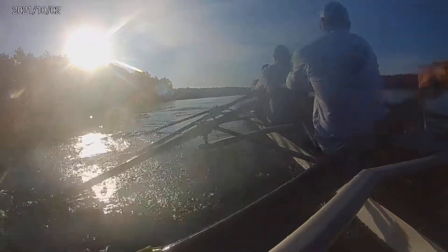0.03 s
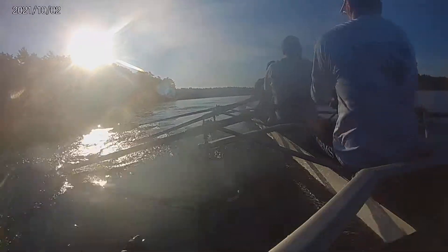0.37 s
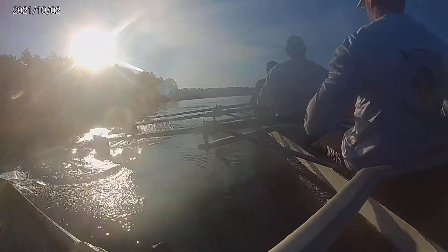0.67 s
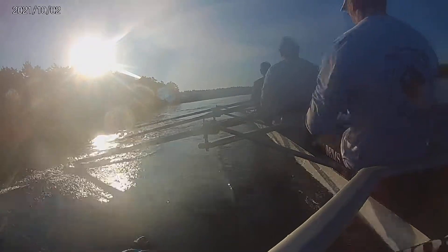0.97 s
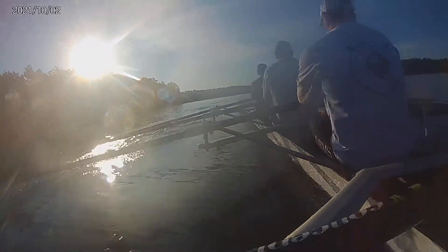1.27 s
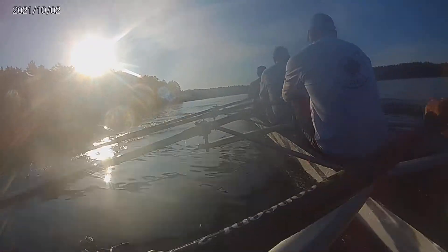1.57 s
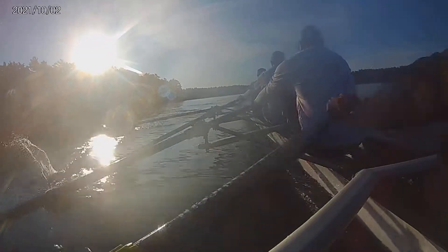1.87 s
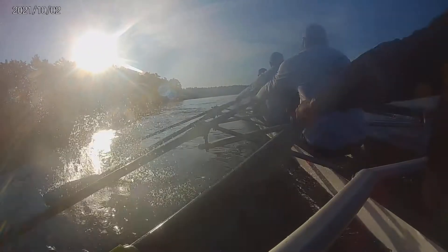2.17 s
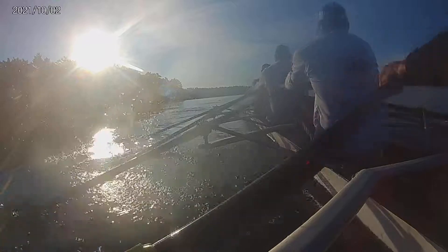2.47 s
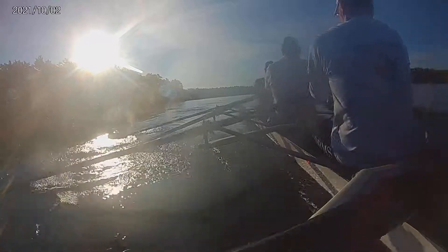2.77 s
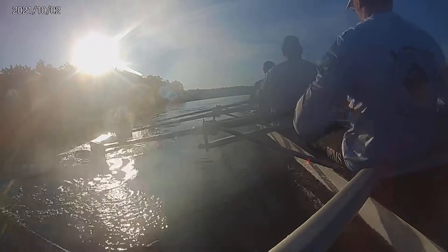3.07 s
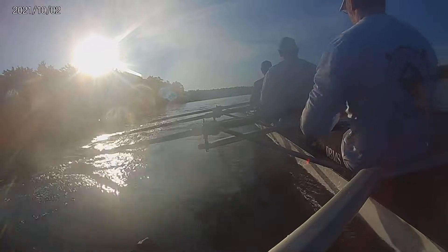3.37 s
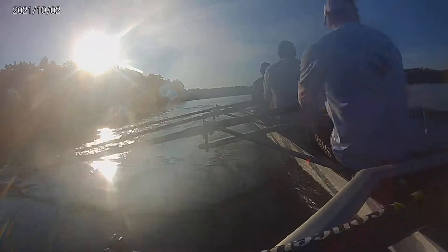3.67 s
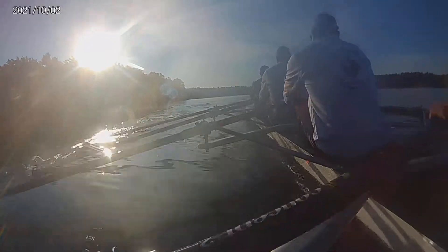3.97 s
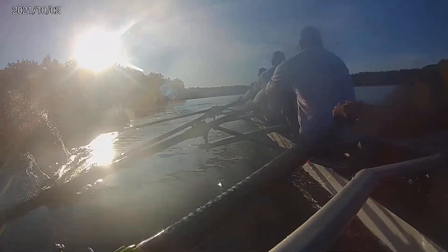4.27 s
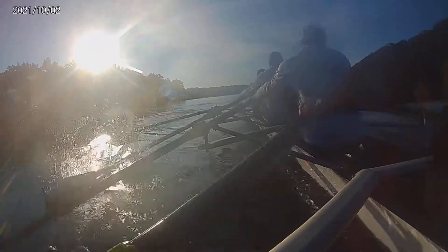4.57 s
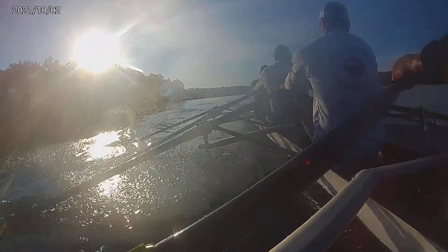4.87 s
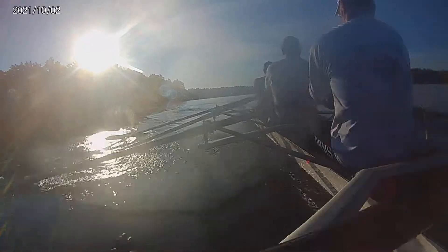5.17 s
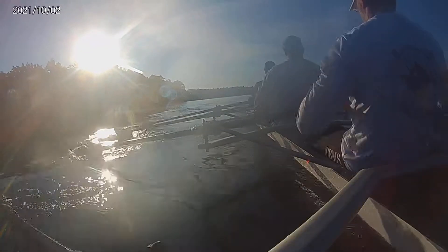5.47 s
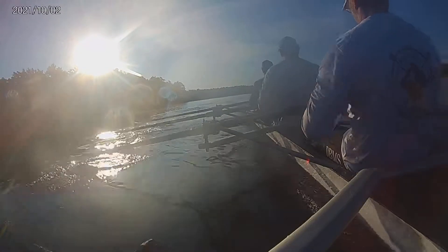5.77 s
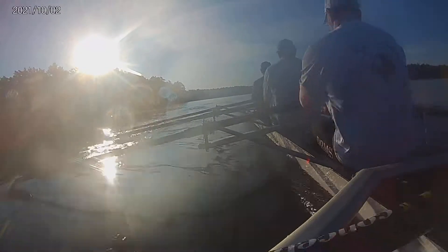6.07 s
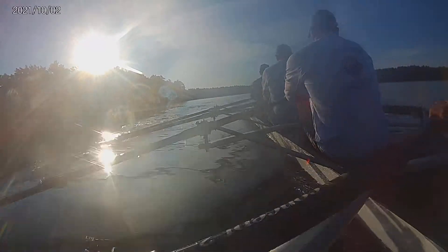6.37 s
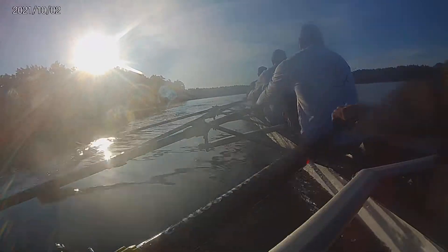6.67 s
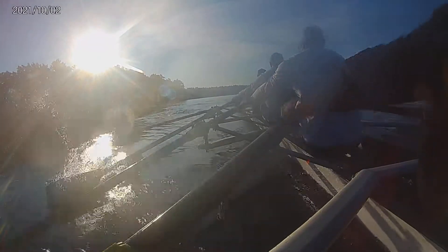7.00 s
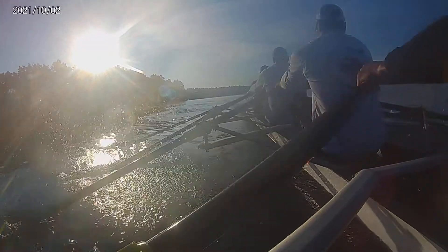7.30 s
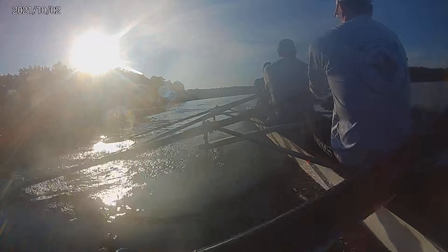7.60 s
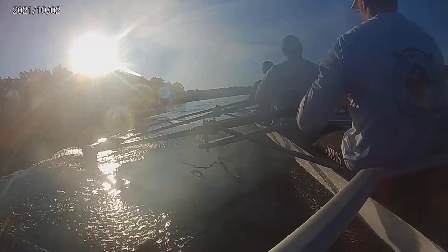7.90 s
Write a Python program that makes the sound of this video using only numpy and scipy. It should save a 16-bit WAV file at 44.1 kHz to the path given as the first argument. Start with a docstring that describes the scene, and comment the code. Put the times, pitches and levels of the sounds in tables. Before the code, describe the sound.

Hard, hollow knocks of oars in their locks come in a steady rowing rhythm, over sliding seats that rumble along their tracks. Water churns dully on each pull, the hull drums, and the oars scrape briefly before leaving the water. Between strokes the sound eases to light rattles and a few sharp ticks. The microphone sits in a case fixed to the boat, so it all sounds close and boxy, with slight overload.

```python
"""Oars knock in their locks as a crew rows a racing shell on calm water; riggers and hull ring.
Seats rumble along their tracks, the hollow hull booms, blades churn the water, the frame sways.
Oar sleeves scrape, wet plastic squeaks, sharp ticks sound. All is heard through a closed camera case
clamped to the boat; vibration overloads the microphone at catch and finish, so loud moments crackle."""
import sys
import numpy as np
from scipy import signal
from scipy.io import wavfile
from scipy.ndimage import uniform_filter1d

SR = 44100
rng = np.random.default_rng(int(sys.argv[2]) if len(sys.argv) > 2 else 0)


def bounce(signal):
    """Save signal as a 16-bit WAV file at the path given by the first command-line argument."""
    frames = np.transpose(np.atleast_2d(signal))
    limited = np.clip(frames, -1, 1)
    pcm = np.round(limited * 32767).astype(np.int16)
    wavfile.write(sys.argv[1], SR, pcm)


N = 350154
TIME_S = np.arange(N) / SR
CONTROL_HOP = 40  # samples per step of slow curves

# Oar and seat knocks. Each row: start in seconds, then hull thump, rigger clunk, lock clack in relative dB.
KNOCKS = [(0.01, -6, -14, -34), (0.125, -6.5, -35, -40), (0.362, 2, -5, -22), (0.371, 8.5, -15, -10.5),
          (0.411, -4, -15, -18.5), (0.432, -18, -12, -28), (0.472, -4.5, -0.5, -9.5),
          (0.508, -3.5, 0, -5.5), (0.603, 10, -9.5, -14), (0.641, 8, -5.5, -22), (0.849, -22, -16, -18),
          (0.973, 12, -4, -5), (1.437, -26, -28, -18), (1.604, -22.5, -37, -27), (1.853, -9.5, -10, -28),
          (1.897, 5, -2, -1), (1.918, 10, -1, -20), (2.108, 6, 1, -8), (2.191, -5, -11.5, -12.5),
          (2.351, -15, -26, -16), (2.737, 2.5, -13, -19), (3.089, 2, -6, -11.5), (3.172, 0.5, -6.5, -12.5),
          (3.216, 4.5, -25, -30), (3.47, -31, -28, -25.5), (3.803, -3.5, -15.5, -28),
          (3.878, -3.5, -28, -13.5), (3.934, -6, -28, -15.5), (4.191, -2, -15, -17.5),
          (4.323, 9, -3.5, 0.5), (4.334, 9.5, -0.5, -20), (4.56, 5, 1, -16), (4.612, 6.5, -18, -10),
          (4.762, -34, -24, -15), (5.128, 7, -13.5, -15), (5.297, -13.5, -15.5, -20.5),
          (5.433, 4, -20, -20.5), (5.496, 6.5, -8.5, -26), (5.586, 2.5, -13.5, -40), (6.258, -11, -28, -19),
          (6.476, -11, -27, -22), (6.645, -13, -15.5, -20), (6.749, 3.5, 0, -13), (6.783, 12, -6.5, -17),
          (6.957, -4, -11.5, -24), (7.046, 5.5, -17, -9), (7.133, -12, -24, -12.5), (7.172, 3, -20, -15),
          (7.212, 2, -26, -17), (7.704, 9.5, -4, -10), (7.835, -11, -12, -19.5)]
# Modes rung by a knock. Each row: frequency in Hz, relative level in dB, 60 dB decay time in seconds.
HULL_MODES = [(117, -8, 0.068), (163.4, -2.5, .17), (211.7, -6, 0.15), (297.3, -8.5, 0.063)]
RIGGER_MODES = [(364, -10.5, 0.017), (471.7, -0.5, 0.06), (666.7, 5, 0.094), (682.4, -2.5, 0.096),
                (897, -20, 0.1)]
LOCK_MODES = [(1107, -2, 0.087), (1321, 8, 0.053), (1496, 1, 0.034), (1594, -2, 0.075), (1749, -9.5, 0.015)]
# Blades enter at the catch, leave at the finish. Each row: catch time, finish time and finish length
# in seconds, then seat, catch and finish gain in dB.
STROKES = [(-0.53, 0.508, .22, -2, -1, 0.5), (1.893, 2.988, 0.2, 0, -3, 0.5),
           (4.323, 5.426, .14, -0.5, 0.5, 0.5), (6.744, 7.875, .14, 1.5, -2, -1)]
# Seat rumble over a stroke, loudest when fastest. Each row: seconds after the catch, relative level in dB.
SEAT_RUN = [(0.0, -21), (0.12, -15.5), (0.38, -21.5), (0.75, -27), (0.88, -25), (1.2, -28.5), (1.45, -36.5),
            (1.68, -33), (2.0, -24), (2.25, -20.5), (2.37, -23.5)]
# Seat stops and surges. Each row: centre in seconds, half length in seconds, level change in dB.
SEAT_CHANGES = [(0.35, 0.03, 5), (1.038, 0.032, -8), (1.998, 0.056, 3), (3.13, 0.046, 8), (3.27, .03, -6),
                (3.42, 0.048, -7), (3.51, 0.054, 2.5), (4.162, .03, 3), (5.386, 0.054, -12.5),
                (5.66, .05, -7), (5.913, 0.1, -7), (6.842, 0.029, -9.5), (7.772, 0.052, -11),
                (7.904, 0.029, 11.5)]
# Resonances of boat parts and camera case. Each row: centre in Hz, width in Hz, gain in dB.
TRACK_BANDS = [(1075.7, 47, -7), (1299.3, 62, -1.5), (1422.7, 104, 1.5), (1511, 209, -3.5),
               (1792, 130, -18.5), (2353, 45, -19)]
BEARING_BANDS = [(3170, 120, -4.5), (4330, 970, -7), (5600, 1400, -12.5)]
HULL_BANDS = [(176.7, 40.3, -2), (209, 128, -21), (332, 48, -23.5)]
RIGGER_BANDS = [(363, 25, -11), (465.9, 31, -0.5), (645.6, 32, 0), (691.3, 81, -0.5), (828, 130, -8),
                (1115, 390, -13.5)]
FRAME_BANDS = [(28.7, 29.3, -4), (50.9, 15, -7), (70, 10.7, 8), (100.4, 36.4, -7.5), (124.6, 26, -10),
               (215.7, 22, -11.5), (269.6, 47, -15.5)]
SLEEVE_BANDS = [(1241, 170, 5.5), (1869, 125, 5), (2140, 400, -35), (3200, 1200, -25), (4140, 640, -18.5),
                (5400, 1100, -32.5)]
CASE_BANDS = [(1570, 320, 10), (3830, 730, -0.5), (5140, 830, -2), (6360, 730, -6.5)]
# Lurches as the crew swings forward. Each row: peak time in seconds, relative level in dB.
LURCHES = [(0.79, -11.5), (1.119, -18), (3.73, -24.5), (3.89, -20.5), (6.259, -11.5)]
# Sleeves grinding in the locks. Each row: peak time in seconds, 20 dB rise in seconds, relative level in dB.
SCRAPES = [(0.29, .17, -23.5), (2.78, 0.14, -27), (2.925, 0.1, -25), (5.17, 0.03, -22), (7.61, 0.2, -27.5)]
# Sharp ticks: drops on the case and brief overload crackles.
# Each row: start in seconds, relative level in dB.
TICKS = [(0.023, -37), (0.9223, -26), (1.1087, -25), (1.6871, -37), (3.3563, -28.5), (3.4196, -40),
         (3.706, -34), (3.803, -37), (4.2363, -35), (4.6703, -43), (5.7608, -43), (6.2612, -23.5),
         (6.4218, -35)]
# Gear squeaks. Each row: start and length in seconds, start and end pitch in Hz, level in dB.
SQUEAKS = [(7.27, .11, 4500, 4400, -42), (7.43, .08, 5620, 5700, -50)]


def knocks(thump_db, clunk_db, clack_db, travel_s):
    """A blow in the lock travels down the rigger into the hull."""
    out = np.zeros(N)
    for start_s, hull_db, rigger_db, lock_db in [*KNOCKS, *rattles(per_s=3, spread_db=2.5)]:
        thump = strike(HULL_MODES, uneven_db=4.5, rattle=0.25, rattle_s=0.013)
        clunk = strike(RIGGER_MODES, uneven_db=2.5, rattle=0.91, rattle_s=0.0097)
        clack = strike(LOCK_MODES, uneven_db=5, rattle=2.5, rattle_s=0.0094)
        add(out, start_s + travel_s, from_db(hull_db + thump_db) * thump)
        add(out, start_s, from_db(rigger_db + clunk_db) * clunk)
        add(out, start_s, from_db(lock_db + clack_db) * clack)
    return out


def strike(modes, uneven_db, rattle, rattle_s):
    """One contact and a brief rattle ring a part; rms 1 over the first 20 ms."""
    t = TIME_S[:SR // 3]
    hz, db, t60_s = np.transpose(modes)[:, :, None]
    size, detune = rng.standard_normal((2, len(modes), 1))
    decay = from_db(db + uneven_db * size - 60 * t / t60_s)
    ring = np.sum(decay * np.sin(2 * np.pi * hz * (1 + 0.024 * detune) * t), axis=0)
    force = rng.standard_normal(len(t)) * np.exp(-t / rattle_s)
    force *= rattle / np.linalg.norm(force)
    force[0] += 1
    sound = signal.fftconvolve(force, ring)[:len(t)]
    return sound / np.sqrt(np.mean(sound[:SR // 50] ** 2))


def rattles(per_s, spread_db):
    """Loose gear knocks at random, harder as the seats run faster; rows as in KNOCKS."""
    chance = rng.random((int(per_s * N / SR), 4))
    start_s = chance[:, 0] * N / SR
    db = np.interp(start_s, TIME_S, seat_level_db())[:, None] + spread_db * (2 * chance[:, 1:] - 1)
    return np.column_stack([start_s, db + [8, -4, -6]])  # thump, clunk, clack


def seats(bumps_per_s, bump_db, judder_db, bearing_db, mount_hz):
    """Wheels press unevenly over grit and pits in the tracks; their bearings ring thinly."""
    contact = grains(bumps_per_s, bump_db) * from_db(judder_db * drift(19))
    tracks = low_pass(resonate(contact, TRACK_BANDS), mount_hz, order=8)
    bearings = from_db(bearing_db) * rms_one(resonate(contact, BEARING_BANDS))
    return from_db(seat_level_db()) * (steady(tracks, span_s=0.049) + bearings)


def seat_level_db(stroke_s=2.425):
    """The seats repeat one run each stroke, harder or softer, with brief stops and surges."""
    t = TIME_S[::CONTROL_HOP]
    catch_s, _, _, seat_db, _, _ = np.transpose(STROKES)
    run_db = np.interp(t - catch_s[0], *np.transpose(SEAT_RUN), period=stroke_s)
    change_db = sum(db * np.exp(-((t - s) / half_s) ** 2) for s, half_s, db in SEAT_CHANGES)
    return np.interp(TIME_S, t, run_db + np.interp(t, catch_s, seat_db) + change_db)


def hull(flutter_db):
    """The hollow shell drums under seats and water, in slow throbs."""
    drumming = steady(resonate(rng.standard_normal(N), HULL_BANDS), span_s=0.066)
    swing = from_db(-20.5) * catches(lag_s=-0.43, attack_s=0.22, hold_s=0.15, release_s=0.16)
    drive = from_db(-12.5) * catches(lag_s=0.018, attack_s=0.17, hold_s=0.36, release_s=0.058)
    way_out = from_db(-7.5) * finishes(lag_s=0.02, attack_s=0.13, release_s=0.069)
    load = follow_seats(level_db=-19, share=0.84) + swing + drive + way_out
    return load * drumming * from_db(flutter_db * drift(12))


def blade_wash(gulps_per_s, gulp_db):
    """Collapsing water pockets shake blades and riggers as the blades enter, in two bites, and as they leave."""
    entry = from_db(-16.5) * catches(lag_s=0.004, attack_s=0.042, hold_s=0.04, release_s=0.056)
    second_bite = from_db(-15.5) * catches(lag_s=0.2, attack_s=0.083, hold_s=0.06, release_s=0.13)
    way_out = from_db(-15) * finishes(lag_s=0.003, attack_s=0.075, release_s=0.075)
    churn = follow_seats(level_db=-24.5, share=0.61) + entry + second_bite + way_out
    return churn * steady(resonate(grains(gulps_per_s, gulp_db), RIGGER_BANDS), span_s=0.066)


def frame_sway():
    """The frame's lowest modes swell as the boat lurches and the blades enter and leave."""
    lurches = sum(from_db(db) * swell(s, attack_s=0.024, hold_s=0.022, release_s=0.22) for s, db in LURCHES)
    entry = from_db(-15.5) * catches(lag_s=0.033, attack_s=0.34, hold_s=0.27, release_s=0.16)
    way_out = from_db(-8) * finishes(lag_s=0.077, attack_s=0.19, release_s=0.24)
    sway = from_db(-36.5) + lurches + entry + way_out
    return sway * steady(resonate(rng.standard_normal(N), FRAME_BANDS), span_s=0.056)


def sleeve_scrapes(slips_per_s, slip_db):
    """The oar sleeve sticks and slips against the lock in a quick, uneven chatter."""
    slip_phase = np.cumsum(slips_per_s * (1 + 0.15 * drift(15))) / SR % 1
    friction = rng.standard_normal(N) * from_db(-slip_db * slip_phase)
    pressure = sum(from_db(db) * swell(s, rise_s, hold_s=0.03, release_s=0.1) for s, rise_s, db in SCRAPES)
    return pressure * rms_one(resonate(friction, SLEEVE_BANDS))


def ticks(gain_db, decay_s):
    """Sharp ticks: drops on the case and brief overload crackles."""
    bursts, t = np.zeros(N), TIME_S[:SR // 20]
    for start_s, db in TICKS:
        add(bursts, start_s, from_db(db + gain_db) * rng.standard_normal(len(t)) * np.exp(-t / decay_s))
    return resonate(bursts, CASE_BANDS)


def patter_and_crackle():
    """Water patters as the blades lift; a fine, high crackle runs through the swing back."""
    texture = 0.77 * rng.standard_normal(N) + grains(per_s=22, spread_db=2.5)
    lift = from_db(-45.5) * finishes(lag_s=0.05, attack_s=0.2, release_s=0.2)
    swing = from_db(-51.5) * catches(lag_s=-0.34, attack_s=0.25, hold_s=0.87, release_s=0.2)
    return (from_db(-53.5) + lift + swing) * rms_one(resonate(texture, CASE_BANDS))


def squeaks():
    """Wet plastic gives short gliding whistles."""
    out = np.zeros(N)
    for start_s, length_s, start_hz, end_hz, db in SQUEAKS:
        n = int(length_s * SR)
        pitch_hz = np.linspace(start_hz, end_hz, n) + 25 * drift(80)[:n]
        add(out, start_s, from_db(db) * np.hanning(n) * np.sin(2 * np.pi * np.cumsum(pitch_hz) / SR))
    return out


def swell(peak_s, attack_s, hold_s, release_s):
    """Gain of 1 from peak_s through the hold; attack and release are times per 20 dB."""
    t = TIME_S[::CONTROL_HOP]
    before = np.maximum(peak_s - t, 0) / attack_s
    after = np.maximum(t - peak_s - hold_s, 0) / release_s
    return np.interp(TIME_S, t, from_db(-20 * np.minimum(before + after, 10)))


def catches(lag_s, attack_s, hold_s, release_s):
    """One swell per blade entry."""
    return sum(from_db(db) * swell(catch_s + lag_s, attack_s, hold_s, release_s)
               for catch_s, _, _, _, db, _ in STROKES)


def finishes(lag_s, attack_s, release_s):
    """One swell per blade exit, held while the blades are drawn out."""
    return sum(from_db(db) * swell(finish_s + lag_s, attack_s, length_s, release_s)
               for _, finish_s, length_s, _, _, db in STROKES)


def follow_seats(level_db, share):
    """Gain that follows a share of the seats' swing in dB."""
    seat_db = seat_level_db()
    return from_db(level_db + share * (seat_db - seat_db.mean()))


def grains(per_s, spread_db):
    """Tiny random impacts of uneven size; rms 1."""
    sizes = from_db(spread_db * np.minimum(rng.exponential(1, N), 4)) * rng.choice([-1, 1], N)
    return rms_one(sizes * (rng.random(N) < per_s / SR))


def drift(rate_hz):
    """Smooth random wander at about rate_hz; rms 1."""
    pole = np.exp(-2 * np.pi * rate_hz * CONTROL_HOP / SR)
    settle_steps = 2000
    noise = rng.standard_normal(N // CONTROL_HOP + 2 + settle_steps)
    slow = signal.lfilter([1], [1, -2 * pole, pole * pole], noise)[settle_steps:]
    return np.interp(np.arange(N) / CONTROL_HOP, np.arange(len(slow)), rms_one(slow))


def resonate(x, bands):
    """Parallel resonances, each two band-passes in series."""
    out = 0
    for hz, width_hz, db in bands:
        r = np.exp(-np.pi * width_hz / SR)
        gain = (1 - r * r) / 2
        section = [gain, 0, -gain, 1, -2 * r * np.cos(2 * np.pi * hz / SR), r * r]
        out = out + from_db(db) * signal.sosfilt([section, section], x + 1e-18)
    return out


def steady(x, span_s):
    """Hold rms at 1 over span_s; faster flutter stays."""
    power = np.abs(uniform_filter1d(x * x, int(span_s * SR)))
    return x / np.sqrt(power + 1e-12)


def low_pass(x, hz, order):
    return signal.sosfilt(signal.butter(order, hz, fs=SR, output="sos"), x)


def bass_cut(x, from_hz, to_hz):
    """Shelf falling 6 dB an octave between two corners."""
    return signal.lfilter(*signal.bilinear([1, 2 * np.pi * to_hz], [1, 2 * np.pi * from_hz], SR), x)


def add(out, start_s, sound):
    at = max(0, round(start_s * SR))
    out[at:at + len(sound)] += sound[:max(0, N - at)]


def from_db(db):
    return 10 ** (np.asarray(db) / 20)


def rms_one(x):
    return x / np.sqrt(np.mean(x ** 2) + 1e-20)


def scene():
    """Mono mix of what reaches the camera through the boat's frame."""
    mount_hz = 2090  # the camera mount passes little above this
    rolling = seats(bumps_per_s=2200, bump_db=3.5, judder_db=2.5, bearing_db=-31, mount_hz=mount_hz)
    boom = from_db(0.5) * hull(flutter_db=1.95)
    water = from_db(-2) * blade_wash(gulps_per_s=2500, gulp_db=2)
    sway = from_db(2.5) * frame_sway()
    blows = knocks(thump_db=-4.5, clunk_db=0.5, clack_db=-0.44, travel_s=0.00202)
    through_mount = low_pass(blows + water + sway, mount_hz, order=8)
    leak = from_db(-35) * blows
    sleeves = from_db(3.5) * sleeve_scrapes(slips_per_s=110, slip_db=16.5)
    treble = squeaks() + ticks(gain_db=8.5, decay_s=0.006) + patter_and_crackle()
    return (through_mount + leak + from_db(2.5) * rolling + boom + sleeves + treble)[None]


def record(dry):
    """The input clips flat; a bass cut turns the square edges into spikes, dulled by a treble roll-off."""
    clip_level, cutoff_hz = 0.68, 15800
    clipped = clip_level * dry / (1 + np.abs(dry / clip_level) ** 24) ** (1 / 24)
    thin = bass_cut(clipped, from_hz=596, to_hz=56)
    dull = low_pass(low_pass(thin, hz=3210, order=2), hz=6600, order=4)
    leak = from_db(-31) * thin
    hiss = from_db(-86) * np.diff(rng.standard_normal(N + 1))
    band_limit = signal.ellip(10, 0.1, 80, cutoff_hz, fs=SR, output="sos")
    return signal.sosfilt(band_limit, dull + leak + hiss)


dry = scene()
out = record(dry)
bounce(out)
```